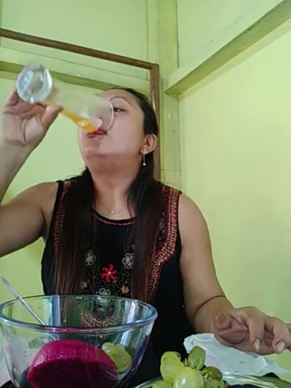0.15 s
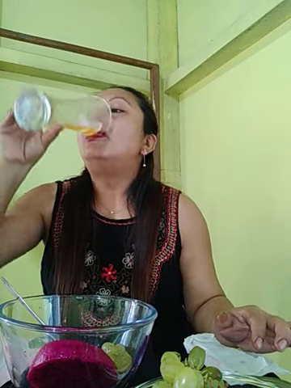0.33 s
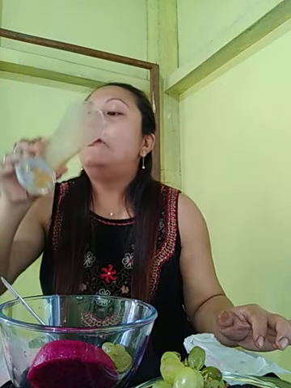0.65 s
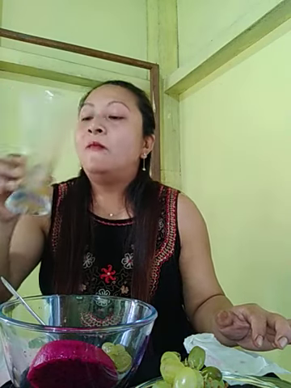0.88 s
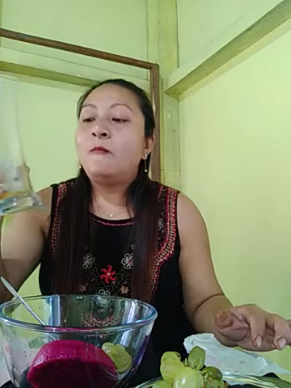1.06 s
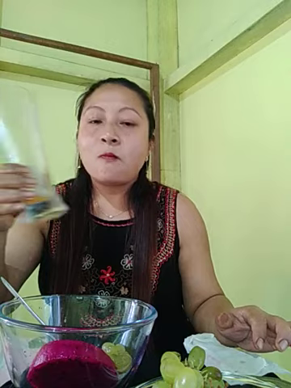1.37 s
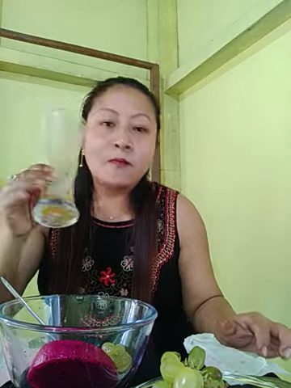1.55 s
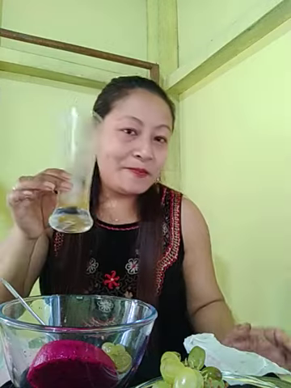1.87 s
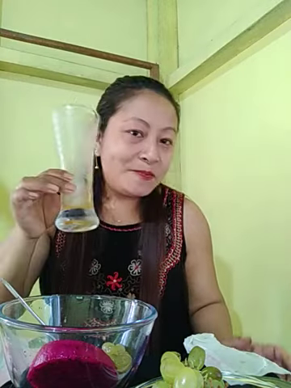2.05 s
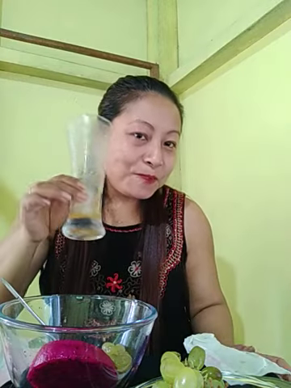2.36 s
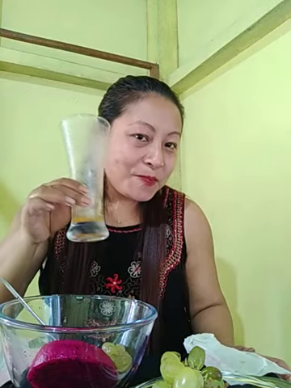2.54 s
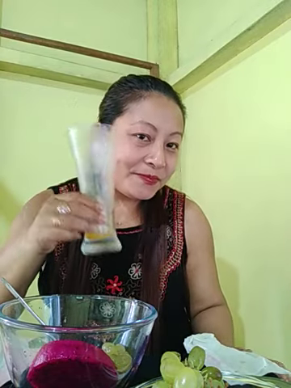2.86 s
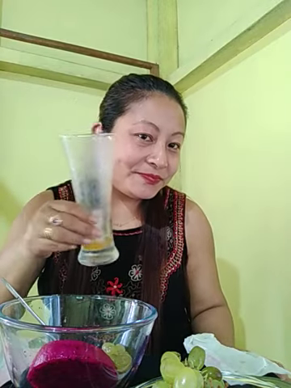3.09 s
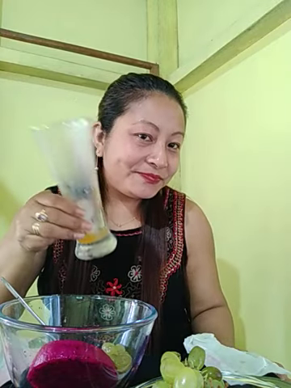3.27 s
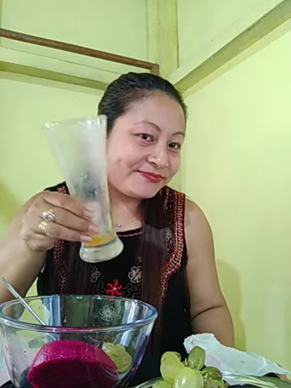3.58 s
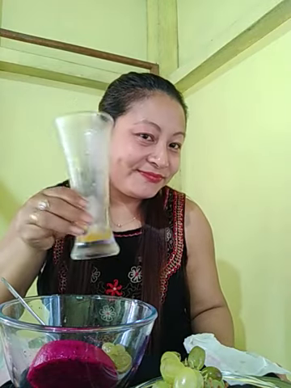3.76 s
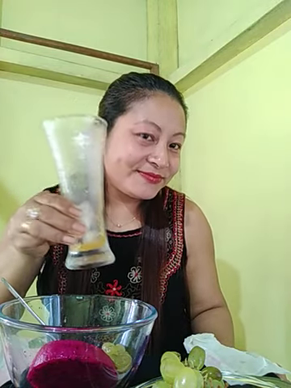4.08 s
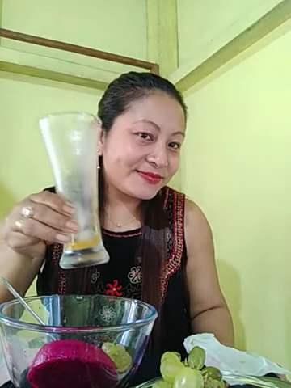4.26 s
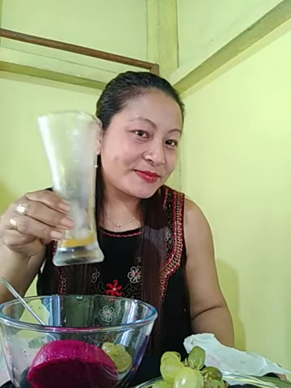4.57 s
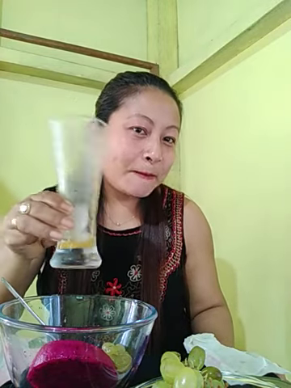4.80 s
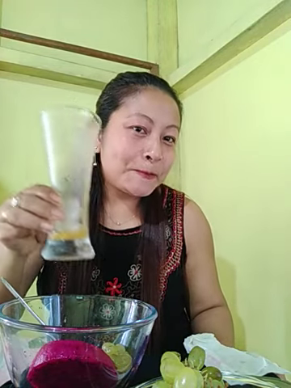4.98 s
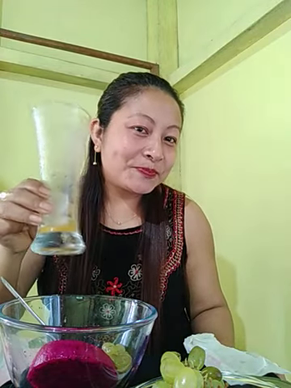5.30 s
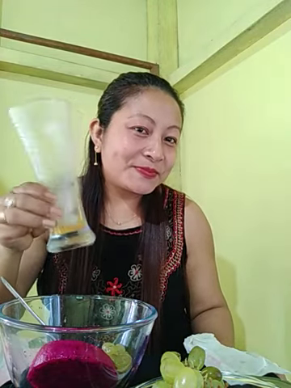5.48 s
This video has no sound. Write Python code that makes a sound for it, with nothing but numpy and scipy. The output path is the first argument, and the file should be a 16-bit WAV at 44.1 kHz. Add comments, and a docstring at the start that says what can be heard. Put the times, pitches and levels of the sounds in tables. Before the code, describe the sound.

Soft gulp and sharp lip smack, then nails clink on a nearly empty drinking glass, faint at first, brightest around four seconds.

```python
"""In a small bare room, fingernails tap a tall drinking glass in quick runs, amid gulps, a loud lip smack and wet pops.
The glass is a sum of decaying modes: harder contacts excite the high ones more, and the grip frees or mutes the rim.
Mouth and throat are resonances driven by clicks; the last of the drink laps as short bubbles of rising pitch.
Sparse reflections form the room's echo; a phone stands close by, over filtered-noise rumble and hiss and a thin whine.
"""
import sys
import numpy as np
from scipy import signal
from scipy.fft import rfft, irfft
from scipy.io import wavfile
from scipy.ndimage import uniform_filter1d

SR = 44100
rng = np.random.default_rng(int(sys.argv[2]) if len(sys.argv) > 2 else 0)


def put_to_file(sound):
    """Save the sound as 16-bit audio at rate SR, in the file named by the first command-line argument."""
    columns = np.atleast_2d(sound).T  # one column per channel
    safe = np.clip(columns, -1, 1)
    whole_steps = np.round(safe * 32767)
    wavfile.write(sys.argv[1], SR, whole_steps.astype(np.int16))


N = 248635
# time axis of every single event [s]
RING = np.arange(int(.35 * SR)) / SR
# the two clearest tones of the glass
MAIN_HZ, RIM_HZ = 4211, 1529


def undb(db):
    """Level to amplitude: 20 dB is a factor of ten."""
    return 10 ** (np.asarray(db) / 20)


def add(track, s, sound):
    """Superposition: mix a sound in at time s."""
    i = min(int(s * SR), N)
    track[..., i:i + sound.shape[-1]] += sound[..., :N - i]


def late(x, s):
    """Propagation delay of s seconds."""
    i = int(s * SR)
    return np.concatenate([np.zeros_like(x[..., :i]), x[..., :x.shape[-1] - i]], axis=-1)


def fade(t60):
    """Exponential damping: the level falls 60 dB in t60 seconds."""
    return np.exp(-np.log(1000) * RING / t60)


def onset(t, rise_s):
    """Finite contact time: the force presses in smoothly."""
    return 1 - np.exp(-(t / rise_s) ** 2)


def unit(x):
    """Normalise to an rms of 1."""
    return x / np.sqrt(np.mean(x ** 2))


def at(points, hz):
    """Interpolate a spectrum on a log-frequency axis."""
    f, value = np.transpose(points)
    return np.interp(np.log(np.maximum(hz, 1)), np.log(f), value)


def curves(rows):
    """Interpolate the columns of a time table, sample by sample."""
    s, *columns = np.transpose(rows)
    return [np.interp(np.arange(N) / SR, s, c) for c in columns]


def colour(x, points):
    """Minimum-phase filtering: the folded cepstrum makes a (Hz, dB) shape causal."""
    size = 2048
    cepstrum = irfft(np.log(undb(at(points, np.fft.rfftfreq(size, 1 / SR)))))
    cepstrum[1:size // 2] *= 2
    cepstrum[size // 2 + 1:] = 0
    response = irfft(np.exp(rfft(cepstrum)))
    return signal.fftconvolve(x, response)[:len(x)]


def background(rumble_db=-1, hiss_db=-2, flutter_db=4.5, side_db=-18, hiss_flutter_db=0.5):
    """Coherence of ambient noise: uneven rumble almost alike in both ports, under a more diffuse hiss."""
    # noise spectrum before the band split: (f/Hz, relative level/dB per Hz)
    air_spectrum = [(20, -27), (40, -16), (65, -6.5), (102, 2), (180, -17.5), (260, -7), (400, -8.5),
                    (700, -12), (1240, -20.5), (2490, -14.5), (5000, -24.5), (7300, -38.5), (9800, -39.5),
                    (12500, -31.5), (15500, -34.5)]
    # course of the background: (t/s, relative rumble level/dB, relative hiss level/dB)
    air_levels = [(0, -55.5, -71), (.3, -51, -54.5), (.5, -54.5, -55), (1.25, -52.5, -53),
                  (1.5, -61.5, -59.5), (1.8, -56.5, -54), (4.2, -53, -60), (5.64, -62, -55.5)]
    rumble_level, hiss_level = curves(air_levels)
    low, high = (signal.butter(3, 220, kind, fs=SR, output="sos") for kind in ("low", "high"))
    # one noise common to both ports, then one for each port
    common, *separate = [colour(rng.standard_normal(N), air_spectrum) for _ in range(3)]
    separate = np.array(separate)
    flutter = unit(uniform_filter1d(rng.standard_normal(N), SR // 15))
    rumble = unit(signal.sosfilt(low, common + undb(side_db) * separate) * undb(flutter_db * flutter))
    apart = signal.sosfilt(signal.butter(1, 1200, "high", fs=SR, output="sos"), separate)
    hiss = unit(signal.sosfilt(high, 0.4 * common + apart))
    rumble_gain = undb(rumble_level + rumble_db)
    hiss_gain = undb(hiss_level + hiss_db + hiss_flutter_db * flutter)
    return rumble * rumble_gain + hiss * hiss_gain


def whine(waver=0.00083, whine_db=-1, waver_db=3):
    """Frequency and amplitude modulation: a thin sine wavers around a drifting pitch and level."""
    # course of the whine: (t/s, centre f/Hz, relative level/dB)
    whine_course = [(0.6, 2950, -100), (1.05, 3021, -62.5), (1.35, 3096, -61), (1.55, 3085, -66),
                    (2.0, 3099, -54), (2.35, 3103, -60), (2.5, 3161, -69.5), (2.64, 3143, -56),
                    (3.5, 3263, -98.5), (4.8, 3124, -64), (5.2, 3157, -56.5), (5.5, 3116, -68.5)]
    hz, db = curves(whine_course)
    drift = unit(uniform_filter1d(rng.standard_normal(N), SR // 20))
    phase = 2 * np.pi * np.cumsum(hz * (1 + waver * drift)) / SR
    return undb(db + whine_db + waver_db * drift) * np.sin(phase)


def room(echo_db=-1, gap_s=0.0048, alike_hz=1300, first_rate=350, thicken_s=.025):
    """Reverberation of bare walls: reflections crowd together in time; the bass reaches both ports alike."""
    # decay of the room, at least 0.1 s: (f/Hz, t60/s)
    room_decay = [(200, 0.2), (800, 0.37335), (2500, 0.10967), (4500, 0.2878), (6000, 0.1), (13000, 0.2)]
    # echo spectrum: (f/Hz, relative level/dB)
    room_spectrum = [(200, 5.5), (800, -6), (2500, 0), (3700, -4.5), (4200, -8), (5300, 2.5), (13000, -7)]
    hz = np.fft.rfftfreq(len(RING), 1 / SR)
    # chance of a reflection in each sample, rising from first_rate per second
    share = np.minimum(first_rate * (1 + (RING / thicken_s) ** 2) / SR, 1)
    signs = rng.choice([-1, 1], (2, len(RING)))
    present = rng.random((2, len(RING))) < share
    mid, side = rfft(signs * present / np.sqrt(share))
    alike = np.exp(-(hz / alike_hz) ** 2)
    ports = mid * np.sqrt(1 + alike) + side * np.sqrt(1 - alike) * np.array([[1], [-1]])
    noise = ports / np.sqrt(2) * undb(at(room_spectrum, hz))
    centres = np.geomspace(100, 16000, 10)
    response = 0
    # each overlapping band decays at its own rate
    for centre, pick in zip(centres, np.eye(len(centres))):
        envelope = fade(max(at(room_decay, centre), 1 / 10)) * (RING > gap_s)
        band = irfft(noise * at(np.c_[centres, pick], hz), len(RING))
        response = response + band * envelope / np.linalg.norm(envelope)
    return undb(echo_db) * response


def heard(x, echo):
    """Convolution with the room: the direct sound, a little later at the left port, plus its echo."""
    lag_s = .000182
    direct = np.array([late(x[0], lag_s), x[1]])
    return direct + signal.fftconvolve(x, echo, axes=1)[:, :x.shape[1]]


def slosh(slosh_db=-58, scatter_db=4, low_hz=260, high_hz=850, count=110):
    """Bubble resonance: the last of the drink laps in the moving glass as soft, short, rising tones."""
    out = np.zeros(N)
    t60, glide = .07, 1.0  # s; the pitch rises by 2 * glide of itself per second
    for when, pitch, size in rng.random((count, 3)):
        hz = low_hz * (high_hz / low_hz) ** pitch
        tone = np.sin(2 * np.pi * hz * RING * (1 + glide * RING))
        bubble = tone * fade(t60) * (1 - fade(t60 / 2))
        add(out, 1.6 + 3.3 * when, undb(slosh_db + 2 * scatter_db * size) * bubble)
    return out


def ring(modes, detune=.012, rise_s=0.0007464):
    """Modal synthesis: damped sines, each shifted a little at random by every blow."""
    tones = 0
    for hz, db, t60 in modes:
        shifted_hz = hz * (1 + detune * rng.standard_normal())
        tones = tones + undb(db) * fade(t60) * np.sin(2 * np.pi * shifted_hz * RING)
    return tones * onset(RING, rise_s)


def cluster(hz, spread_hz, t60, count=6):
    """Beating: close partners of one mode interfere as they fade."""
    partners = hz + spread_hz * (np.linspace(-1.5, 1.5, count) + rng.uniform(-.3, .3, count))
    phases = rng.uniform(0, 2 * np.pi, count)
    t = RING[:int(t60 * SR)]
    angles = 2 * np.pi * partners[:, None] * t + phases[:, None]
    z = np.exp(1j * angles).sum(0) * fade(t60)[:len(t)]
    # equal energy, however the partners interfere
    z *= onset(t, .0014) * np.linalg.norm(fade(t60)) / np.linalg.norm(z)
    return np.pad(z.imag, (0, len(RING) - len(t)))


def mode(hz, spread_hz, t60):
    """Modal bandwidth: partners closer than about the width set by damping ring as one clean tone."""
    if spread_hz * t60 < 2.5:
        return ring([(hz, 0, t60)], detune=spread_hz / hz, rise_s=0.0004625)
    return cluster(hz, spread_hz, t60)


def rattle(points, t60, rate):
    """Sparse random impulses: a dying shower of tiny clicks, rate per second on average."""
    clicks = rng.standard_normal(len(RING)) * (rng.random(len(RING)) < rate / SR)
    return colour(clicks * np.sqrt(SR / rate) * fade(t60), points)


def burst(points, t60):
    """Transient noise: a short coloured crack that builds as the nail presses in."""
    press = onset(RING, .0012)
    return colour(rng.standard_normal(len(RING)) * press * fade(t60), points)


def mouth(smack_t60=0.06876, smack_rate=4500, gulp_db=12, gulp_rate=400, pop_spread=0.05798):
    """Source and filter: wet clicks and cavity modes make smacks, filtered thuds gulps, beating modes pops."""
    # lips and tongue part: (t/s, cavity ring level/dB, wet click level/dB)
    smacks = [(0.641, -53, -24.5), (0.764, -47.5, -21.5), (.7745, -3.5, -10), (.7785, -19.5, -15.5),
              (.792, -39.5, -23), (.8045, -15, -19), (.815, -17.5, -26.5), (.8435, -16.5, -27),
              (0.866, -24.5, -25.5), (.885, -30, -34.5), (.916, -24.5, -41.5), (1.087, -27.5, -43)]
    # mouth resonances before random detuning: (f/Hz, relative level/dB, t60/s)
    cavity_modes = [(714.8, -1.5, 0.044517), (1355.9, -8.5, 0.037), (1419.8, -7.5, 0.019),
                    (2230, -1, 0.019755), (3489.8, -4, 0.03068), (3697.5, -22.5, 0.018),
                    (4065, -15.5, 0.056)]
    # wet lip click spectrum: (f/Hz, relative level/dB)
    lip_spectrum = [(150, -22.5), (600, -10), (1400, 1), (2600, -5), (4000, 10), (5500, -14), (7300, -32.5),
                    (9000, -16.5), (10500, -25), (12300, -7.5), (15500, -17)]
    # swallows: (t/s, length/s, relative level/dB)
    gulps = [(0.652, 0.04394, -43), (0.746, 0.03616, -48.5), (1.084, 0.0617, -47.5),
             (4.861, 0.04939, -52.5), (5.248, 0.07146, -41.5)]
    # throat spectrum: (f/Hz, relative level/dB)
    throat_spectrum = [(60, -36), (120, -21), (190, -12), (260, 0), (340, -11), (560, -7.5), (720, -14.5),
                       (860, -26), (1500, -29), (4000, -48.5)]
    # small wet pops: (t/s, centre f/Hz, level/dB, t60/s)
    pops = [(.807, 1401, -16.5, 0.04944), (.814, 2307, -18, 0.01765), (.846, 1386, -18, 0.0582),
            (.867, 3282, -19.5, 0.04422), (.874, 2114, -13, 0.024316), (0.884, 2302, -19, 0.01744),
            (1.113, 1457, -14, 0.013233), (1.725, 1260, -26, 0.0807), (1.7411, 1202, -29, 0.03),
            (2.333, 933.8, -43, 0.0897), (2.372, 810.7, -39, 0.0972), (3.35, 580.2, -52.5, 0.1843),
            (3.45, 606.6, -51, 0.1128)]
    out = np.zeros(N)
    for s, cavity_db, wet_db in smacks:
        cavity = undb(cavity_db) * ring(cavity_modes, detune=0.015, rise_s=0.003232)
        wet = undb(wet_db) * rattle(lip_spectrum, smack_t60, smack_rate)
        add(out, s, cavity + wet)
    for s, length, db in gulps:
        swell = np.sin(np.pi * np.minimum(RING / length, 1)) ** .5
        thuds = (rng.random(len(RING)) < gulp_rate / SR) * rng.choice([-1, 1], len(RING))
        swallow = unit(colour(thuds * swell, throat_spectrum))
        add(out, s, undb(db + gulp_db) * swallow * np.sqrt(length) / 3)
    for s, hz, db, t60 in pops:
        add(out, s, undb(db) * cluster(hz, pop_spread * hz, t60))
    return out


def tap(ring_db, ring_t60, hard_db, knock_db, nail_db, pan_db, rim_db, sparkle_db):
    """Impact excitation: a contact clicks, knocks and rings; a harder one excites the high modes more."""
    # glass modes in the families main, rim, upper, sparkle:
    # (centre f/Hz, relative level/dB, t60 as a share of the family's t60, partner spacing scale/Hz)
    glass_modes = dict( main=[(MAIN_HZ, -6.5, 1.24, 11), (MAIN_HZ, -0.23, 0.4904, 4.4),
                   (4182, -22, 1.5, 110.5), (4936, -27.5, 1.126, 57.5)], rim=[(RIM_HZ, 7.359, 3.671, 0.73)],
                   upper=[(2978.9, -0.5, 0.42, 60), (5607, 3.5, 0.4095, 15), (5542.8, 3.5, 0.24393, 110),
                   (6487.8, -19.5, 0.39, 140), (8458, -1.5, 0.32, 62)], sparkle=[(9026, 2.5, 0.22, 190),
                   (11701, 2.5, 0.26, 93), (12523, 8, 0.45, 110), (13500, 2, 0.47, 200),
                   (14266, -5, 0.35, 74)])
    # how the rim, upper and sparkle families follow hardness:
    # (relative level at ordinary hardness/dB, slope/dB per dB)
    hardness_response = dict( rim=(-59, .8), upper=(-41.5, 1.0), sparkle=(-52, 0.92775))
    # dull knock resonances before random detuning: (f/Hz, relative level/dB, t60/s)
    knock_modes = [(729.93, -8.5, 0.14975), (794.97, -1.5, 0.019297), (1492, -4, 0.05),
                   (1304.2, -5.5, 0.012), (2120.7, -1.5, 0.02415), (3375.2, -18, .03)]
    # nail click spectrum: (f/Hz, relative level/dB)
    click_spectrum = [(100, -59), (400, -24), (900, 2.5), (2000, 8.5), (3600, 16), (4800, -19),
                      (6300, -22.5), (7400, -57), (9500, -19.5), (12500, -9.5), (15500, -16)]
    usual_hard_db, other_t60_s = -42, .11
    main_db, body_db, click_db, vary_db = 1.5, 4.5, 12.0, 3.3773
    click_t60, chatter_t60 = 0.014596, 0.045535  # s
    chatter_db, chatter_rate = -10.5, 300  # dB, clicks per second
    buzz, buzz_t60 = 0.2, 0.28  # depth, s
    rim, upper, sparkle = (db + slope * (hard_db - usual_hard_db) for db, slope in hardness_response.values())
    # the fingers damp every tap a little differently
    t60 = other_t60_s * rng.uniform(.8, 1.2)
    levels = (ring_db + main_db, rim + rim_db, upper, sparkle + sparkle_db)
    decays = (ring_t60, t60, t60, t60)
    families = []
    for level, decay, modes in zip(levels, decays, glass_modes.values()):
        family = 0
        for hz, mode_db, share, spread in modes:
            gain = undb(level + mode_db + vary_db * rng.standard_normal())
            family = family + gain * mode(hz, spread, share * decay)
        families.append(family)
    main, *others = families
    body = ring(knock_modes, detune=.035)
    # the nail chatters briefly and roughens the ring
    chatter = rattle(click_spectrum, chatter_t60, chatter_rate)
    click = burst(click_spectrum, click_t60) + undb(chatter_db) * chatter
    smooth = uniform_filter1d(rng.standard_normal(len(RING)), size=60)
    roughness = unit(uniform_filter1d(smooth, size=30))
    main = main * (1 + buzz * (fade(buzz_t60) - fade(buzz_t60 / 10)) * roughness)
    # the main modes beam to either side as the glass turns; their lobes reach the ports out of step
    lobe_lag_s = .00007
    beam_gains = unit(undb(pan_db * np.array([[1], [-1]]) / 2))
    beam = beam_gains * np.array([main, late(main, lobe_lag_s)])
    return beam + sum(others) + undb(knock_db + body_db) * body + undb(nail_db + click_db) * click


def glass(wall_db=-11, wall_s=0.0087, count=9):
    """Superposed impacts: each tap is trailed by softer fingers, and wall and room answer from varied places."""
    # contacts, mostly nails: (t/s, relative main ring level/dB, main ring t60/s, contact hardness/dB,
    # relative dull knock level/dB, relative click level/dB, main ring left minus right/dB)
    contacts = [(.642, -38.5, 0.0613, -64, -63.5, -46, 8), (.752, -33.5, 0.081, -51.5, -48, -49.5, 6),
                (1.1453, -25, .18, -46.5, -33.5, -42.5, 5.5), (1.608, -17.5, 0.11, -41, -38.5, -39.5, 0),
                (1.6304, -30.5, 0.0785, -40, -34, -38.5, -14), (1.6791, -28.5, 0.153, -47.5, -39.5, -45, 3),
                (1.7394, -39.5, 0.1382, -43, -31.5, -37, 3.5),
                (1.768, -32.5, 0.3403, -46.5, -41.5, -39, 8.5), (1.8267, -10, 0.16555, -28, -31, -28.5, 11),
                (1.945, -31, 0.09737, -54, -41.5, -42, 4.5),
                (2.0557, -33.5, 0.05482, -59, -57.5, -49.5, -0.5),
                (2.144, -32.5, 0.0802, -53.5, -40, -40.5, -4),
                (2.175, -25.5, 0.05314, -54, -45.5, -48.5, 10.5),
                (2.2742, -25, 0.05142, -47.5, -44, -45.5, 12.5), (2.4054, -17.5, 0.17762, -39, -36, -37, 4),
                (2.6614, -30, 0.1455, -51, -46.5, -46.5, 5.5), (2.6835, -36, 0.057, -52, -51, -62, 7.5),
                (2.7591, -27.5, 0.1081, -56.5, -42.5, -40, 10), (2.767, -47.5, .1, -51.5, -36, -46, 2),
                (2.805, -26.5, 0.09, -43, -52, -48, -5), (2.8358, -22, 0.1164, -45, -37, -47.5, -1.5),
                (2.8424, -16, 0.07955, -30.5, -36.5, -37.5, 4.5),
                (2.8953, -30, 0.1245, -62.5, -32.5, -34, 16.5), (2.9257, -23, 0.1605, -43, -35, -32, 4.5),
                (2.9567, -29, 0.1026, -45.5, -40, -46, 17.5), (2.9664, -27, 0.1701, -32, -36.5, -37, 1.5),
                (3.0154, -43, 0.1532, -54.5, -34, -56, 0.5),
                (3.1068, -36.5, 0.04333, -49, -39, -55.5, 14.5),
                (3.2864, -37.5, 0.0976, -68.5, -45.5, -54.5, 6.5),
                (3.4685, -37, 0.1765, -56.5, -36.5, -39.5, 14.5),
                (3.5179, -20, 0.041424, -45, -36.5, -46.5, 15.5), (3.6835, -41, 0.237, -59, -43, -45.5, 11),
                (3.7299, -37, 0.09994, -56.5, -37.5, -40, 13.5),
                (3.8043, -43, 0.0854, -62.5, -45.5, -53.5, 4.5),
                (3.8422, -37, 0.18293, -59, -37, -45.5, 8.5),
                (3.923, -24.5, 0.12446, -43.5, -41.5, -38, 12),
                (3.9704, -14, 0.0673, -32.5, -37, -30.5, 10), (3.9864, -29, 0.104, -42, -33.5, -36, 9),
                (3.9943, -46, .1, -36.5, -31.5, -34, -6.5), (4.0312, -5, 0.2059, -26.5, -39.5, -27.5, 6.5),
                (4.0821, -16, 0.0722, -31.5, -31, -26, 8), (4.1126, -16.5, 0.05273, -47.5, -49, -44, 4),
                (4.1415, -29.5, 0.1306, -38, -31, -35.5, 4.5),
                (4.2153, -23, 0.2664, -42.5, -43.5, -38, 11.5),
                (4.2374, -31, 0.132, -43.5, -37.5, -42, -0.5), (4.2872, -13.5, 0.15077, -36, -33, -32, 7.5),
                (4.3402, -20, 0.1235, -38.5, -35.5, -35.5, 13.5),
                (4.3942, -36.5, 0.05703, -59.5, -41, -51, -12.5), (4.574, -31.5, .115, -60, -64.5, -44, 7),
                (4.6409, -32.5, 0.0752, -46, -67.5, -50.5, 17), (4.7361, -24, 0.07836, -42.5, -42, -36, 5),
                (4.8085, -16, 0.0963, -35.5, -40, -32, 5), (4.9712, -11.5, 0.13437, -25.5, -40.5, -33.5, 0),
                (5.4405, -26, .17, -44.5, -38.5, -37.5, 3), (5.496, -12.5, 0.2416, -27.5, -32, -28.5, 3.5),
                (5.5065, -10.5, 0.18326, -32.5, -45.5, -39, 3.5), (5.513, -18.5, 0.2518, -31, -47, -44, 12),
                (5.5735, -19, 0.1829, -31.5, -29, -27, 0), (5.6003, -16.5, 0.0538, -40.5, -36, -34.5, 10.5)]
    # the hold frees or mutes modes: (t/s, rim tone change/dB, sparkle change/dB)
    grip_course = [(1.1, 12, 1), (1.7, -12, -1), (2.9, -2, -3), (3.85, 0, -3), (4.03, 2, 11), (4.45, -4, 0),
                   (4.64, -5, 0), (4.73, 7, -1), (4.81, 1, -1), (4.97, 9, 4), (5.45, 0, 0)]
    # off-centre taps wake a lower tone of the glass's side: (t/s, level/dB)
    wall_taps = [(4.574, -47.5), (4.735, -32.5)]
    wall_hz, wall_t60_s = 2347.2, 0.10394
    # other fingers land just after the leading one, more softly
    trail_from_s, trail_spread_s = .01, 0.04
    trail_ring_db, trail_hard_db, trail_knock_db, trail_click_db = -22, -13.5, -12, -15
    out = np.zeros((2, N))
    places = [room() for _ in range(count)]
    times, *freedom = np.transpose(grip_course)
    for k, (s, ring_db, ring_t60, hard_db, knock_db, nail_db, pan_db) in enumerate(contacts):
        grip = [np.interp(s, times, db) for db in freedom]
        lead = tap(ring_db, ring_t60, hard_db, knock_db, nail_db, pan_db, *grip)
        softer = (ring_db + trail_ring_db, ring_t60, hard_db + trail_hard_db,
                  knock_db + trail_knock_db, nail_db + trail_click_db, pan_db, *grip)
        trail = sum(late(tap(*softer), trail_from_s + trail_spread_s * lag) for lag in rng.random(size=2))
        add(out, s, heard(lead + trail, places[k % count]))
        # a wall reflection, with its own random delay at each port, reinforces or cancels the ring
        for port in range(2):
            add(out[port], s + wall_s * rng.uniform(.92, 1.08), undb(wall_db) * lead[port])
    for s, db in wall_taps:
        add(out, s, ring([(wall_hz, db, wall_t60_s)], detune=0))
    return out


def scene(mouth_echo_db=1.0):
    """Acoustic shadowing: taps and wet sounds share the room, and the right port hears them duller."""
    # the right port lies in the phone's shadow: (f/Hz, level/dB)
    shadow_spectrum = [(100, 0), (400, 0), (730, -5), (1500, -1), (3000, -1), (4200, 0), (5600, -1),
                       (7000, -1), (8500, -9), (12500, -11), (15000, -7)]
    wet = np.array([mouth() + slosh()] * 2)
    left, right = glass() + heard(wet, undb(mouth_echo_db) * room())
    return np.array([left, colour(right, shadow_spectrum)]) + background() + whine()


def record(dry):
    """Saturation and band limiting: the phone clips at full scale and cuts the top."""
    top_hz = 15600
    low_pass = signal.ellip(10, .2, 80, top_hz, fs=SR, output="sos")
    return signal.sosfilt(low_pass, np.clip(dry, -1, 1))


dry = scene()
out = record(dry)
put_to_file(out)
```